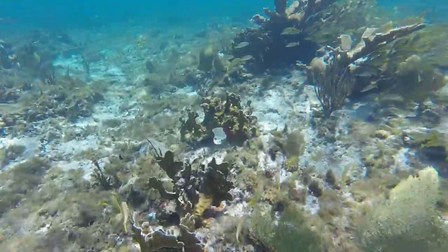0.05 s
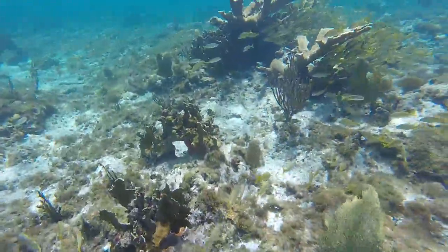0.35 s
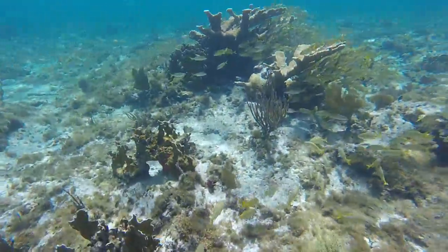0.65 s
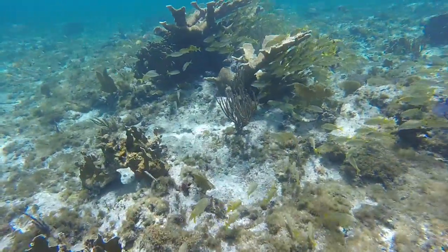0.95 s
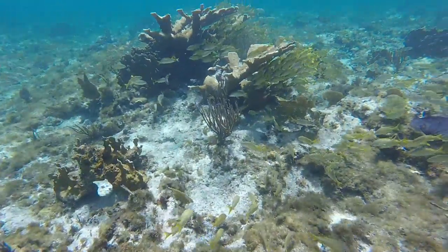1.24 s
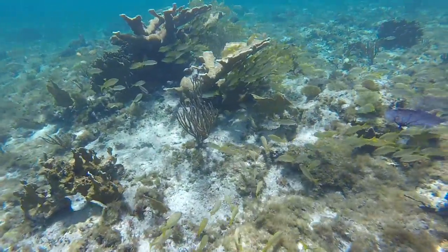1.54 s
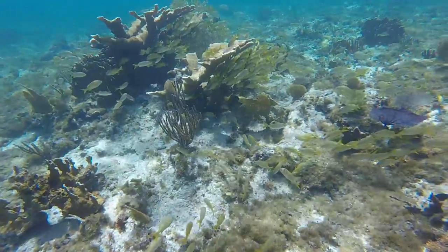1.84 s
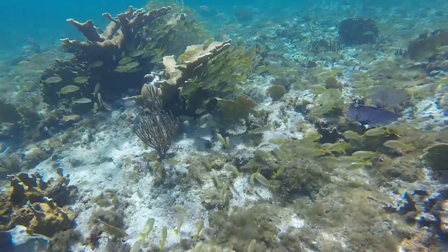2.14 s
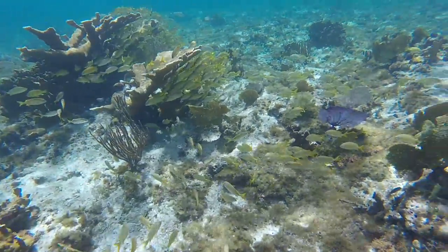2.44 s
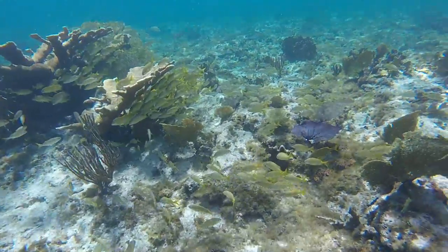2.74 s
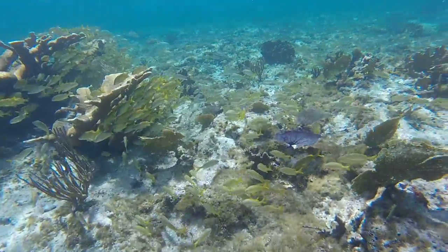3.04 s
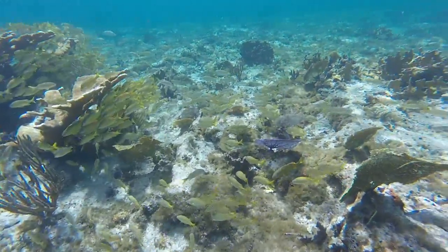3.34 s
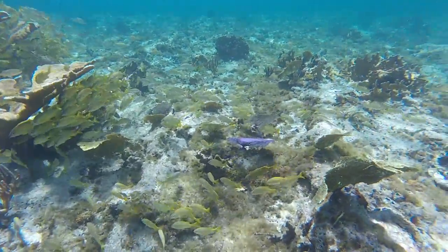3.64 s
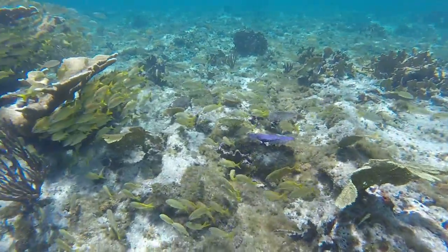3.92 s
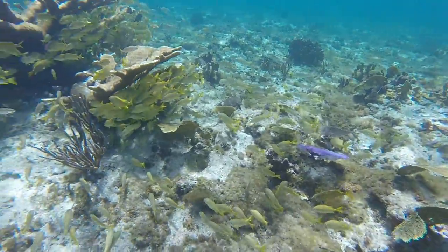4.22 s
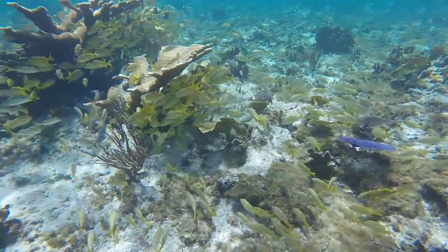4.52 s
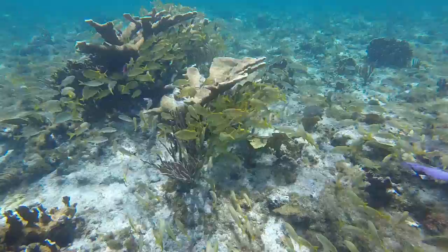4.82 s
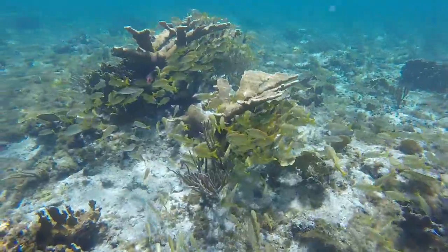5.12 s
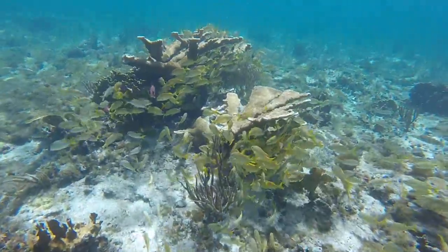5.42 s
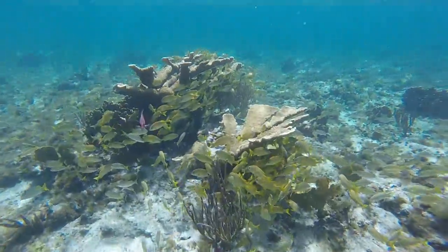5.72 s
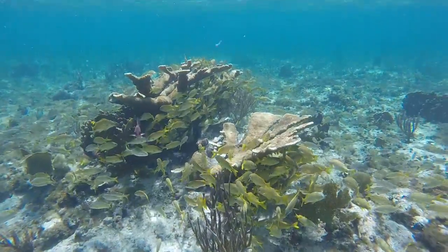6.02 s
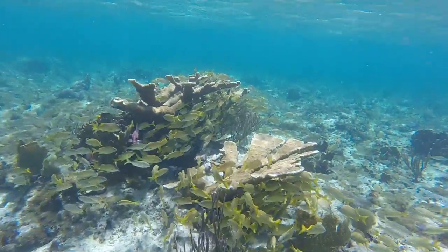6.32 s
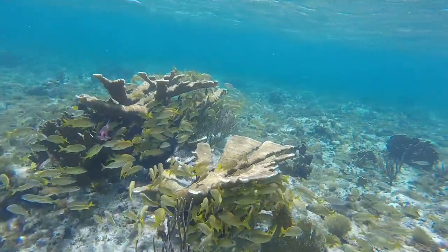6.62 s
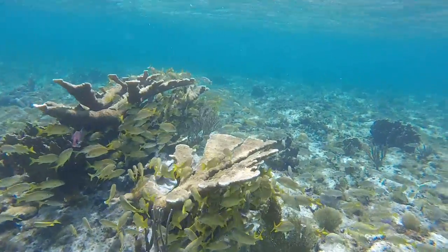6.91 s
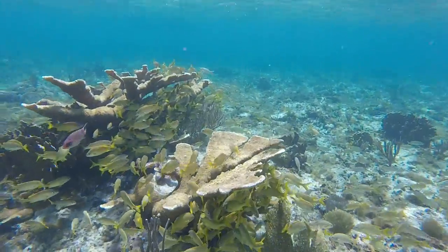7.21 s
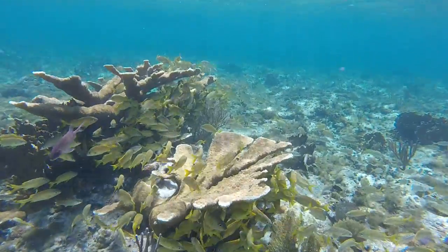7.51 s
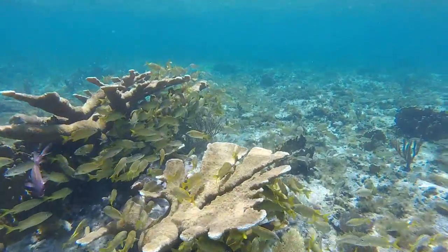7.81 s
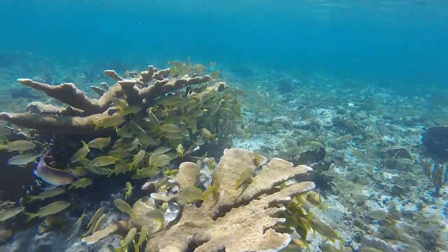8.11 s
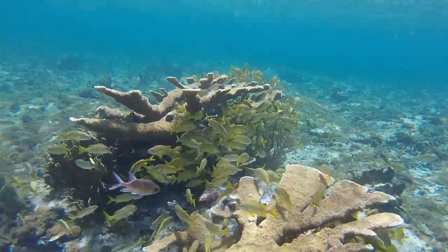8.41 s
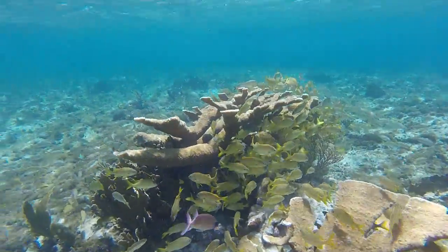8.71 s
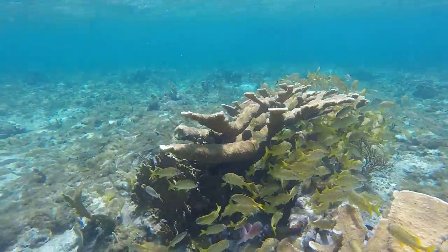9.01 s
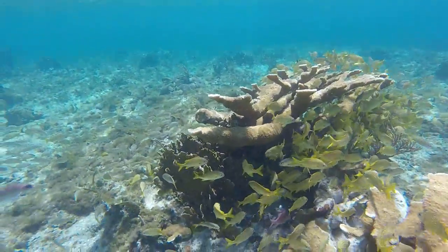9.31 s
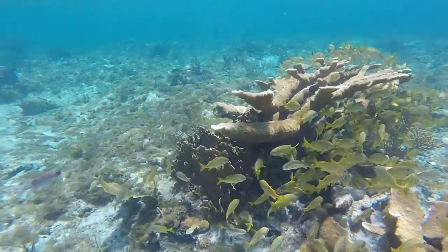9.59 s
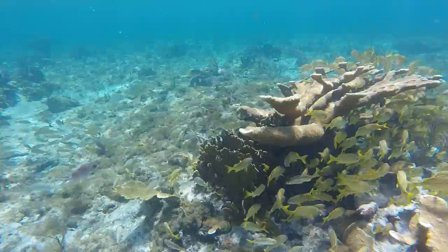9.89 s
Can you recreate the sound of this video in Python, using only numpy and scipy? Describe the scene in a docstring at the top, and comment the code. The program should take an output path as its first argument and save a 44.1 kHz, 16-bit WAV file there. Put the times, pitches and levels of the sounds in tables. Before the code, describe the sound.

Underwater at a reef, a microphone in a closed housing picks up moving water as a dull, wavering rumble with a low hum. It swells with soft thumps at the start and again through the middle, then settles toward the end. All along, scattered crisp shrimp clicks stand out from a faint distant crackle, joined by light gurgling, occasional bubble blips and a few dull ticks on the housing.

```python
"""A deep rumble and a low hum of water, with soft knocks, as a sealed case is swum over a shallow reef.
Large eddies press on the case; fine turbulence drives its low resonance, and knocks swell it briefly.
Snapping shrimp click near and far: each collapsing cavity rings the modes of the case walls.
Bubbles ring and gurgle as their air pulsates, a few dull ticks touch the case, and the far reef hisses."""
import sys
import numpy as np
from scipy import signal
from scipy.fft import rfft, irfft
from scipy.io import wavfile
from scipy.ndimage import uniform_filter1d, map_coordinates

SR = 44100
rng = np.random.default_rng(int(sys.argv[2]) if len(sys.argv) > 2 else 0)


def to_wav(s):
    """Save 16-bit WAV."""
    ch = np.atleast_2d(s).T  # columns
    pcm = np.round(np.clip(ch, -1, 1) * 32767)  # PCM
    wavfile.write(sys.argv[1], SR, pcm.astype(np.int16))


N = 438794

# Fine turbulence on the case. Each row: time in seconds, relative level in dB.
TURBULENCE = [(0.05, -39), (0.35, -44.5), (0.65, -39.5), (0.79, -42), (2.0, -39), (2.61, -45), (3.16, -44),
              (3.6, -46.5), (4.14, -42), (4.33, -34), (4.63, -40.5), (5.62, -36.5), (6.0, -43.5),
              (7.17, -44.5), (7.39, -41), (9.58, -41), (9.85, -40)]
# Soft knocks. Each row: start in seconds, peak of the ring in dB, pitch in Hz, cycles to the crest.
CASE_KNOCKS = [(.092, -26, 237, 0.87), (0.45, -14.5, 223, 3.03), (0.652, -23, 239, 2.3),
               (0.703, -16.5, 218, 1.35), (0.722, -16.5, 209, 2), (0.759, -23, 211, 1.8),
               (1.071, -31, 232, 0.79), (1.133, -27, 206, 4.4), (1.294, -33, 269, 0.56),
               (1.403, -25.5, 190, 1.3), (1.553, -27, 242, 1.7), (1.619, -27.5, 58, 1.7),
               (2.019, -31.5, 250, 0.53), (2.622, -27, 125, 1.2), (2.629, -28.5, 235, 1.2),
               (3.151, -20, 46, 0.4), (3.155, -27.5, 128, 0.57), (3.388, -19.5, 46.6, 1.1),
               (3.403, -21.5, 129, 0.93), (4.145, -25.5, 128, 1.4), (4.169, -10.5, 216, 2.74),
               (4.174, -32, 295, 2.1), (4.375, -23.5, 178, 1.6), (4.518, -31, 257, 3.3),
               (4.959, -26.5, 238, 1.6), (5.45, -21.5, 138, 1.27), (5.508, -18.5, 140, 0.97),
               (6.422, -25, 128, 0.92), (6.495, -23, 142, 0.46), (6.587, -21.5, 211.4, 2.3),
               (7.68, -22, 92, 0.39), (8.623, -28, 62, 0.74)]
# Modes of the case walls. Each row: frequency in Hz, relative level in dB, 60 dB decay time in seconds.
WALL_MODES = [(1307, -15.5, 0.035), (1628, -0.5, 0.018), (1920, 9, 0.0068), (2072, 2.5, 0.017),
              (2825, 6, 0.0086), (3320, 5, 0.011), (3676, 5.5, 0.012), (4290, 2, 0.011),
              (4843, -2.5, 0.014), (5596, -1.5, 0.0092), (6150, -4.5, 0.0053), (6970, -11, 0.0086),
              (7830, -10, 0.0032), (8840, -15, 0.0064), (9800, -16, 0.0019), (11120, -21, 0.0041),
              (12700, -22, 0.004), (14600, -30.5, .004)]


def eddy_rumble(gain_db=9.5, steadiness=0.66, eddy_s=0.03, edge_hz=75):
    """Turbulent pressure: large, slow eddies press on the case as low-frequency noise."""
    # The slow surge of water. Each row: time in seconds, relative level in dB.
    surge = [(0.05, -25), (0.85, -32.5), (1.2, -30.5), (2.3, -33), (3.4, -28), (3.85, -30), (4.35, -30.5),
             (4.7, -28), (5.4, -34), (5.9, -34), (6.08, -37), (6.45, -31), (7.1, -31.5), (8.4, -31.5),
             (9.0, -34), (9.95, -37)]
    # Its spectrum before the low-pass. Each row: frequency in Hz, relative density in dB.
    spectrum = [(5, -7), (10, 5.5), (20, -5.5), (30, -9.5), (45, -14.5), (62, -24), (90, -50), (150, -28),
                (300, -62)]
    # Eddies that buffet the case. Each row: crest time in seconds, height above the surge in dB.
    eddies = [(0.221, 4), (.48, 12), (0.851, 11), (3.17, 2.5), (3.41, 4.5), (4.698, 5.5), (5.12, 2.5),
              (5.521, 12.5), (5.691, 11), (5.871, 9.5), (6.409, 9.5)]
    swirl = noise(spectrum)
    local_power = uniform_filter1d(swirl ** 2, size=6000)
    swirl = rms_one(swirl / local_power ** (steadiness / 2))   # one eddy is much like the next
    t = np.arange(N) / SR
    buffet_db = sum(db * np.exp(-((t - s) / eddy_s) ** 2) for s, db in eddies)
    rumble = swirl * from_db(in_time(surge) + buffet_db + gain_db)
    return butterworth(rumble, 1, edge_hz, "low")


def case_hum(gain_db=3.5, flutter_db=2.0, flutter_hz=25):
    """Forced resonance: small eddies keep the low resonances of the case sounding."""
    # The response of the case. Each row: frequency in Hz, relative density in dB.
    spectrum = [(60, -3.5), (100, -4), (145, -3.5), (175, -3.5), (215, 4), (250, -3), (290, -16.5),
                (345, -24.5), (400, -20.5), (450, -31), (520, -35), (620, -39.5), (1000, -46), (2000, -57)]
    return noise(spectrum) * from_db(in_time(TURBULENCE) + gain_db + flutter_db * drift(flutter_hz))


def knocks(shove=0.71, shove_hz=11):
    """Transient response: a soft push sways the whole case and swells its ring for a few cycles at most."""
    out, t = np.zeros(N), np.arange(SR // 4) / SR
    sway = shove * swell(2 * shove_hz * t) * np.sin(2 * np.pi * shove_hz * t) * (1 - t / t[-1])
    for s, peak_db, hz, cycles in CASE_KNOCKS:
        body = swell(t * hz / cycles) * np.sin(2 * np.pi * hz * t)
        add(out, s, from_db(peak_db) * (body + sway))
    return out


def near_shrimp(claw=0.34, lead_s=0.0005, scatter=0.17, scatter_s=0.0018, echo_db=-41, echo_s=0.0094,
                knee_hz=1900, edge_hz=10000, crack_hz=3500, crack_octaves=0.38, uneven_db=2.5, detune=0.029):
    """Cavitation: a claw shuts, its cavity collapses, and the pulse and its scatter ring the walls."""
    # The nearest snaps. Each row: start in seconds, level over 5 ms in dB before the wall's filtering,
    # brightness in dB per octave, gain of the crack band in dB.
    snaps = [(0.1332, -43.5, 9.5, 7.5), (0.184, -51.5, 0, 4), (0.2666, -44, -2, -18), (0.294, -50, 5.5, -6),
             (0.511, -49, -15, 2), (0.761, -36, 8.5, 1), (0.7862, -43, -13, 5), (0.9132, -55.5, 13, -1),
             (1.002, -49, -6, 5), (1.1122, -49, 6, -1), (1.124, -49.5, 17, 2), (1.2416, -30.5, 1, -8),
             (1.3484, -48, -6.5, -17), (1.382, -53.5, 6, 4), (1.6216, -48, 1, -16), (1.724, -47, -12, 17),
             (1.781, -51, 4, -5), (1.9084, -52, -4, 4), (1.9983, -29, -1, 4.5), (2.4246, -49, 19, 7),
             (2.767, -51, -2, -4), (2.812, -49, 3, 6), (2.8274, -46, 6, -9), (3.213, -44, 0, 9),
             (3.2278, -44, -2, 4), (3.347, -44.5, 8, 1), (3.465, -49.5, -1, 5), (3.5483, -30.5, 1.5, 3),
             (3.6892, -48.5, -5.5, -4), (3.851, -55, 10, -8), (3.882, -51, 3, -5), (3.9453, -51.5, 5, -17),
             (3.9673, -48.5, -3, -1), (4.1254, -54, 12, 3), (4.1514, -47.5, 17.5, 8), (4.5867, -51, 12, 7),
             (4.64, -53, -1, 8), (4.7216, -51.5, -8, 11), (4.7552, -34, -1.5, -1.5),
             (4.927, -47.5, -12, -9), (4.943, -51, -3, 2), (4.979, -48, -1, -8), (5.108, -44, -5, 8),
             (5.273, -42, 0, 0), (5.401, -44.5, 1, 6), (6.182, -48.5, -4, -13), (6.2342, -45.5, 7, -6),
             (6.484, -46.5, 9, 4), (6.534, -43, 3, -6), (6.6924, -48.5, 4, -1), (6.7452, -44, -18, 1),
             (6.84, -51.5, -5, 2), (6.9598, -49.5, 5.5, -11), (7.0098, -46.5, 4, 3), (7.021, -42.5, -3, -4),
             (7.0859, -53, 11, -4), (7.1003, -48.5, 5, -9), (7.168, -45, 4, 2), (7.37, -56.5, 9, -2),
             (7.3902, -47.5, 12, 3), (7.605, -51.5, 3, -6), (7.626, -49.5, 1, -11), (8.008, -34, -3, -1.5),
             (8.214, -41, 3.5, 10), (8.5873, -55.5, 12, 6), (8.648, -48, -5, 5), (8.9556, -57.5, 13, -6),
             (9.1017, -40.5, -1, 6), (9.227, -50, -5, -1), (9.29, -51.5, 14, 12)]
    out, t = np.zeros(N), np.arange(SR // 20) / SR
    tail = scatter * np.exp(-t / scatter_s) + from_db(echo_db) * np.exp(-t / echo_s)   # coral and seabed
    for s, snap_db, brightness, crack_db in list(snaps) + stray_snaps(snaps):
        snap = np.zeros(len(t))
        collapse = int(lead_s * SR * (0.5 + rng.random()))
        for k, (hz, mode_db, t60) in enumerate(WALL_MODES):
            push = tail * rng.standard_normal(len(t))
            push[0] += claw
            push[collapse] += 1
            colour_db = brightness * np.log2(np.clip(hz, knee_hz, edge_hz) / knee_hz)
            colour_db += uneven_db * rng.standard_normal()
            colour_db += crack_db * np.exp(-(np.log2(hz / crack_hz) / crack_octaves) ** 2)
            # Each direction of arrival rings the walls at slightly different pitches.
            pitch = hz * (1 + detune * rng.uniform(-0.89, 1))
            snap += (-1) ** k * from_db(mode_db + colour_db) * ring(push, pitch, t60)
        onset_rms = np.sqrt(np.mean(snap[:SR // 200] ** 2))
        add(out, s, from_db(snap_db) * snap / onset_rms)
    return out


def stray_snaps(snaps, flurry_s=0.35, level_db=-57, spread_db=1.0, tilt_db_per_octave=8):
    """Clustering: shrimp fire in loose flurries, so each snap gets a row for a faint neighbour."""
    when, size, colour = rng.uniform(-1, 1, (len(snaps), 3)).T
    starts = np.clip(np.transpose(snaps)[0] + flurry_s * when, 0, (N - 1) / SR)
    return list(zip(starts, level_db - spread_db * size, tilt_db_per_octave * colour, np.zeros(len(snaps))))


def wall_transmission(x, low_hz=1450, leak_db=-17):
    """Transmission loss: the stiff walls let little of a snap's low end through."""
    return butterworth(x, 6, low_hz, "high") + from_db(leak_db) * x


def bubbles(gain_db=2.0, onset_s=0.0014, rise=0.025, wobble=0.032, wobble_hz=420):
    """Bubble resonance: air is the spring and water the mass; the pitch wobbles and rises a little."""
    # The clearest bubbles. Each row: start in seconds, relative level in dB, pitch in Hz, cycles to 1/e.
    pulsations = [(0.512, -37.5, 2010, 10), (.594, -41.5, 391, 11), (0.718, -43, 1690, 9.2),
                  (.784, -48.5, 1000, 14), (1.4048, -33.5, 924, 4.2), (1.418, -49, 964, 11),
                  (1.853, -47, 537, 9.4), (1.861, -45.5, 1820, 8.1), (2.714, -41, 2800, 9),
                  (3.342, -52.5, 772, 12), (4.026, -47, 1870, 14), (4.264, -46, 2650, 6.5),
                  (4.302, -42.5, 2050, 5.5), (4.398, -39, 384, 9.2), (4.55, -42, 2800, 8),
                  (4.914, -48, 2620, 7.9), (4.978, -33.5, 482, 5), (5.269, -34, 394, 10.7),
                  (6.959, -50.5, 542, 15), (7.395, -43.5, 437, 11.4), (7.507, -47, 668, 12),
                  (7.763, -43.5, 525, 5.5), (8.146, -48, 530, 10), (9.065, -43.5, 1830, 6.7)]
    out, t = np.zeros(N), np.arange(SR // 5) / SR
    waver = wobble * drift(wobble_hz)
    for s, db, hz, cycles in pulsations:
        age = t * hz / cycles
        own_waver = np.roll(waver, -round(s * SR))[:len(t)]
        pitch = hz * (1 + rise * (np.tanh(age) - 0.5) + own_waver)
        envelope = from_db(db + gain_db) * (1 - np.exp(-t / onset_s)) * np.exp(-age)
        add(out, s, envelope * np.sin(2 * np.pi * np.cumsum(pitch) / SR))
    return out


def ticks(pivot_hz=560):
    """Impact excitation: the softer a light contact on the case, the weaker its upper modes."""
    # Dull contacts. Each row: start in seconds, relative level in dB, brightness in dB per octave.
    contacts = [(2.1545, -34.5, 1.5), (3.689, -40, -11), (5.45, -43, -13)]
    # The modes they ring. Each row: frequency in Hz, relative level in dB, 60 dB decay time in seconds.
    modes = [(546, 0, 0.024), (770, -5, 0.044), (1110, -7, 0.031), (1290, -9, 0.022), (1630, 4.5, 0.033),
             (2110, -7, 0.013), (3200, -18, .012)]
    out, click = np.zeros(N), signal.unit_impulse(SR // 10)
    for s, tick_db, brightness in contacts:
        for k, (hz, mode_db, t60) in enumerate(modes):
            gain = from_db(tick_db + mode_db + brightness * np.log2(hz / pivot_hz))
            add(out, s, (-1) ** k * gain * ring(click, hz, t60))
    return out


def gurgle(tiny_db=-73, tiny_follow=0.36):
    """Resonance falls with size: churning water sheds large, low bubbles and a few tiny, high ones."""
    churn_db = churn()
    large = bubble_cloud(per_s=90, low_hz=225.3, high_hz=632.0, cycles=74, db_per_octave=-9.0)
    tiny = bubble_cloud(per_s=29, low_hz=1550, high_hz=3390, cycles=110, db_per_octave=2.5)
    return large * from_db(churn_db) + tiny * from_db(tiny_db + tiny_follow * (churn_db - churn_db.max()))


def churn(base_db=-63.5, follow=0.31, wake_db=-39, wake_s=0.15):
    """Incoherent powers add: the flow and the wake of each knock set the gurgle's level in dB."""
    flow_db, t = in_time(TURBULENCE), np.arange(N) / SR
    power = from_db(base_db + follow * (flow_db - flow_db.mean())) ** 2
    for s, peak_db, _, _ in CASE_KNOCKS:
        wake = from_db(peak_db + wake_db) * swell(np.maximum(t - s, 0) / wake_s)
        power += wake ** 2
    return 10 * np.log10(power)


def bubble_cloud(per_s, low_hz, high_hz, cycles, db_per_octave, sizes=20):
    """Damped oscillators: bubbles ring at random moments, each falling 60 dB in `cycles`; rms 1."""
    out = np.zeros(N)
    for hz in np.geomspace(low_hz, high_hz, sizes):
        births = (rng.random(N) < per_s / sizes / SR) * rng.uniform(0.074, 1, N)
        out += from_db(db_per_octave * np.log2(hz / low_hz)) * ring(births, hz, cycles / hz)
    return rms_one(butterworth(out, 2, [low_hz, high_hz], "band"))


def far_shrimp(per_s=115, level_db=-65, spread_db=3.3, uneven_db=3.5,
               pivot_hz=3500, top_hz=8000, bounce_s=0.003, damping=1.35):
    """Two-path propagation: many faint snaps reach the walls directly and again off the seabed."""
    direct = np.flatnonzero(rng.random(N) < per_s / SR)
    count = len(direct)
    sizes = from_db(spread_db * np.minimum(rng.exponential(1, count), 2.5)) * rng.choice([-1, 1], count)
    delay = (rng.random(count) * bounce_s * SR).astype(int)
    reflected = np.minimum(direct + delay, N - 1)
    brightness = rng.uniform(-16.83, 20.79, count)   # dB per octave, dull to sharp
    out = np.zeros(N)
    for k, (hz, mode_db, t60) in enumerate(WALL_MODES):
        colour_db = brightness * np.log2(min(hz, top_hz) / pivot_hz) + uneven_db * rng.standard_normal(count)
        strength = sizes * from_db(mode_db + colour_db)
        clicks = np.zeros(N)
        clicks[direct] = strength
        clicks[reflected] += strength
        out += (-1) ** k * ring(clicks, hz, t60 / damping)
    return from_db(level_db) * rms_one(out)


def reef_hiss(level_db=-61):
    """Superposition: the reef's most distant crackle merges into steady noise."""
    # The spectrum of the far reef. Each row: frequency in Hz, relative density in dB.
    spectrum = [(500, 7), (1000, 0), (1450, -3), (1700, -2.5), (2050, -2.5), (2400, -7), (2900, -6.5),
                (3900, -7.5), (5000, -11.5), (6200, -8), (8500, -17), (10000, -21), (12500, -29.5),
                (15500, -43)]
    return from_db(level_db) * noise(spectrum)


def from_db(db):
    """Decibels to gain."""
    return 10 ** (np.asarray(db) / 20)


def rms_one(x):
    """Scale to rms 1."""
    return x / np.sqrt(np.mean(x ** 2) + 1e-20)


def in_time(rows):
    """A curve's value at every sample."""
    return np.interp(np.arange(N) / SR, *np.transpose(rows))


def swell(age):
    """A critically damped pulse that crests at height 1 at age 1."""
    return age * np.exp(1 - age)


def drift(rate):
    """A smooth curve through `rate` random values a second; rms 1."""
    knots = rng.standard_normal(4096)
    return rms_one(map_coordinates(knots, [np.arange(N) / SR * rate], order=3, mode="wrap"))


def noise(spectrum):
    """Noise of rms 1 with the given spectrum, falling away beyond its ends."""
    hz, level_db = np.transpose(spectrum)
    f = np.arange(1, N // 2 + 2) * SR / N
    gain = from_db(np.interp(np.log(f), np.log(hz), level_db))
    ends = np.minimum(f / hz[0], 1) ** 2 * np.minimum(hz[-1] / f, 1) ** 2
    return rms_one(irfft(rfft(rng.standard_normal(N)) * gain * ends, N))


def ring(push, hz, t60):
    """A damped mode: a unit click starts a sine of height 1 that falls 60 dB in t60 seconds."""
    r, w = from_db(-60 / (t60 * SR)), 2 * np.pi * hz / SR
    return signal.lfilter([0, np.sin(w)], [1, -2 * r * np.cos(w), r * r], push + 1e-18)


def butterworth(x, order, hz, kind):
    """A filter with a maximally flat passband."""
    return signal.sosfilt(signal.butter(order, hz, kind, fs=SR, output="sos"), x)


def add(track, s, sound):
    """Mix a sound in at s seconds."""
    at = max(round(s * SR), 0)
    track[at:at + len(sound)] += sound[:N - at]


def scene():
    """Superposition: the pressures of reef, water and case add in one channel."""
    hiss = reef_hiss()
    shrimp = wall_transmission(near_shrimp() + far_shrimp())
    return (eddy_rumble() + case_hum() + knocks() + gurgle() + bubbles() + shrimp + ticks() + hiss)[None]


def record(dry, cutoff_hz=15500):
    """Band limiting: a steep low-pass removes the highest treble."""
    return signal.sosfilt(signal.ellip(10, 0.1, 80, cutoff_hz, fs=SR, output="sos"), dry)


dry = scene()
out = record(dry)
to_wav(out)
```